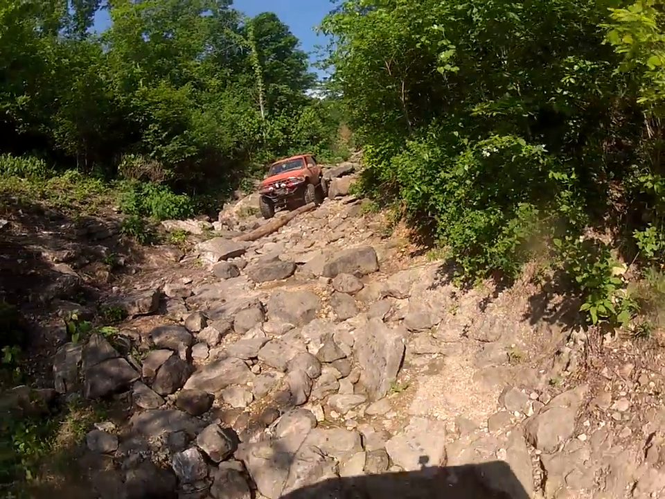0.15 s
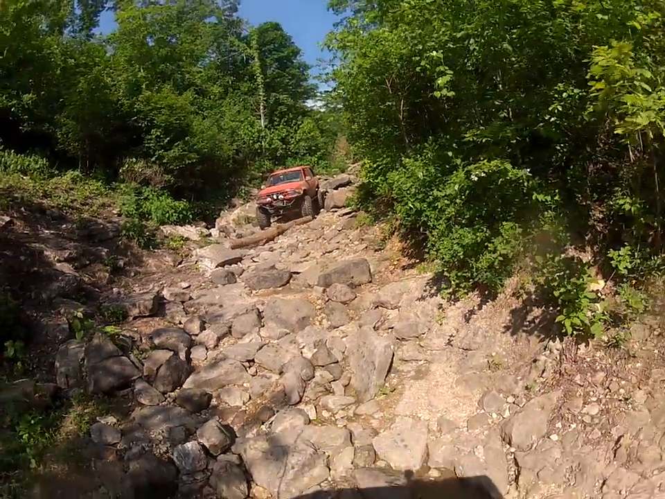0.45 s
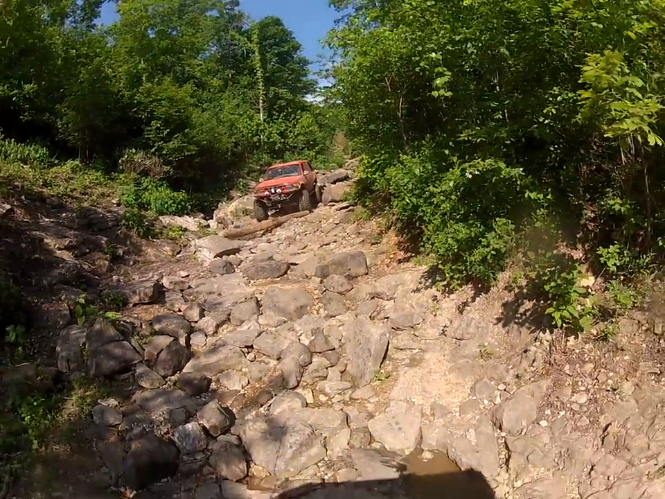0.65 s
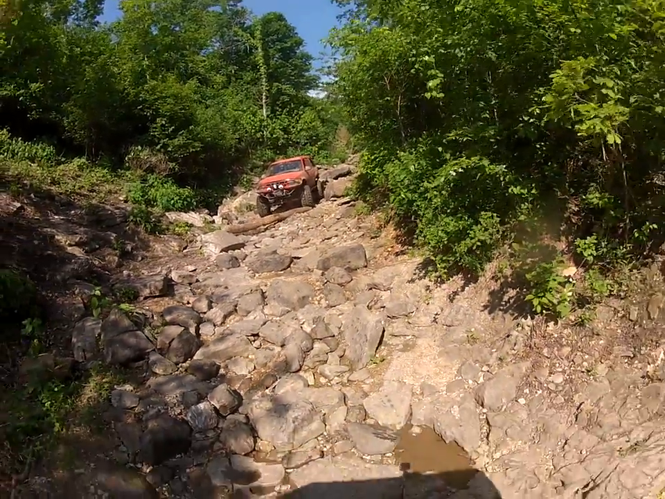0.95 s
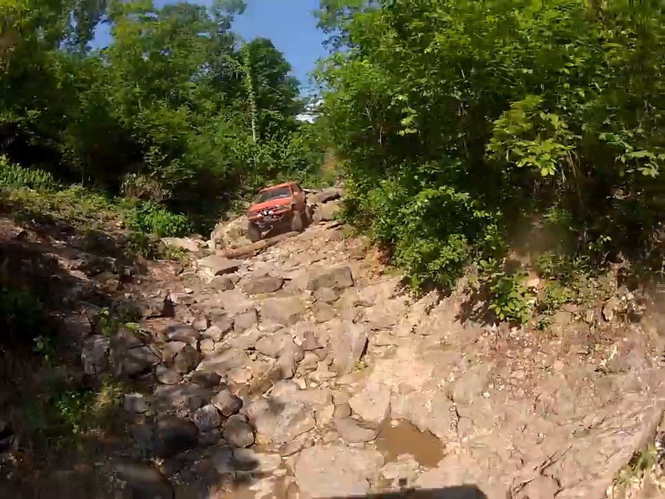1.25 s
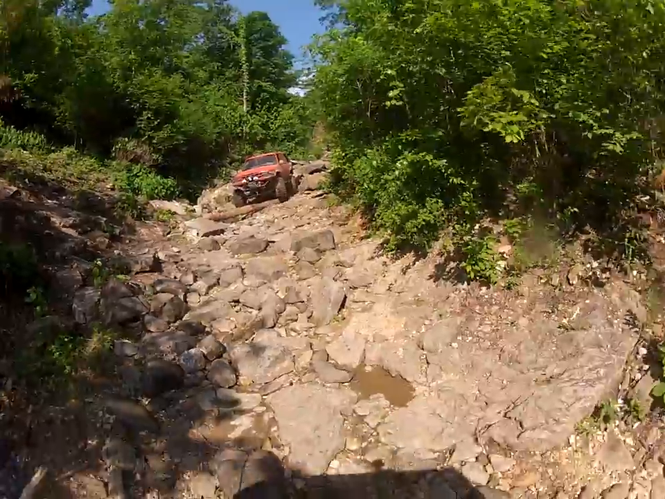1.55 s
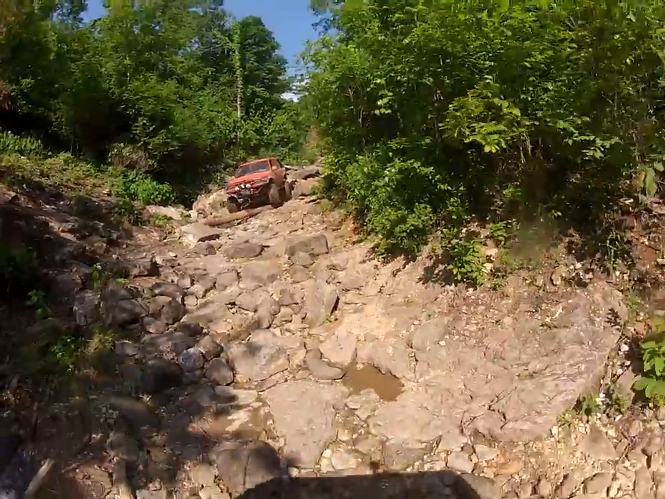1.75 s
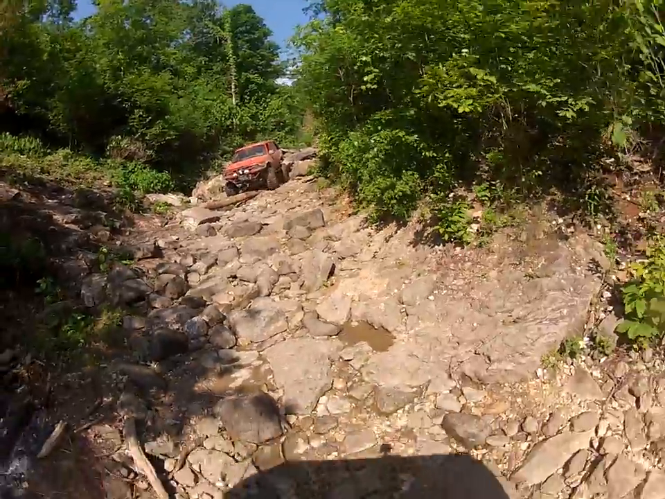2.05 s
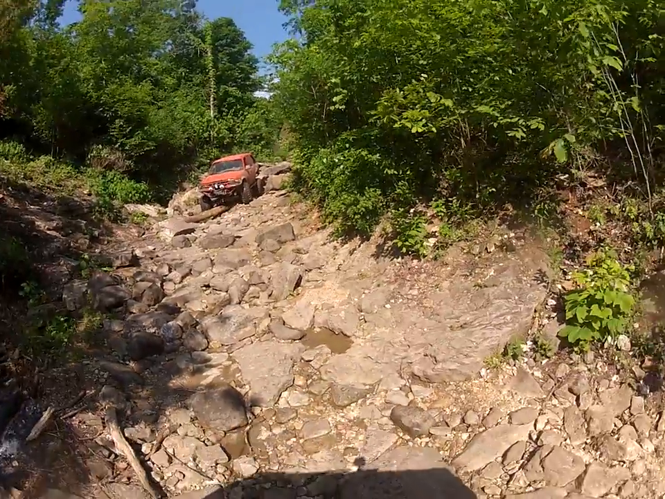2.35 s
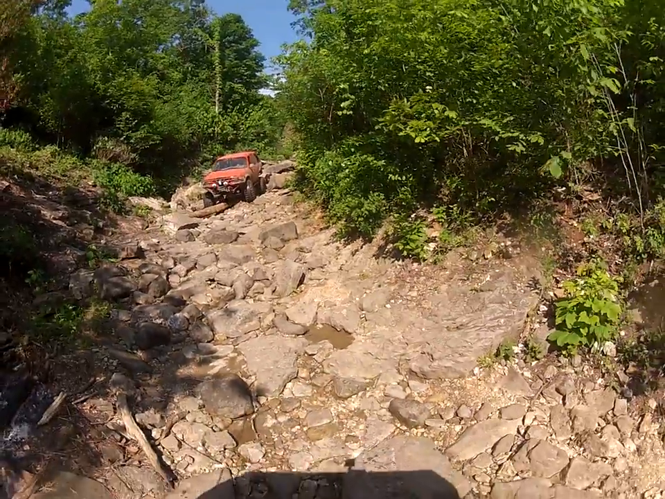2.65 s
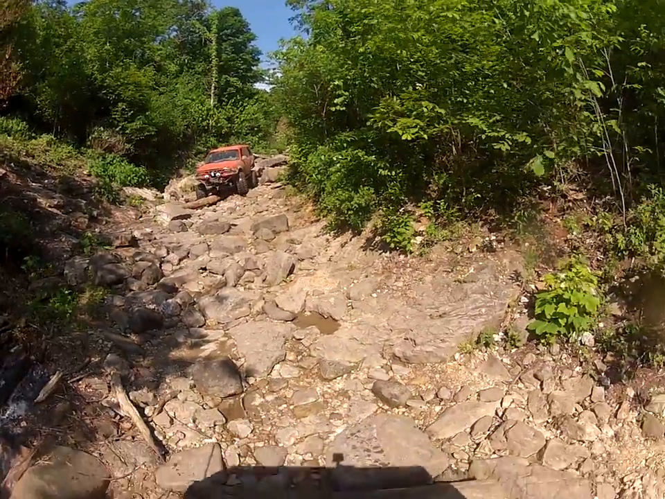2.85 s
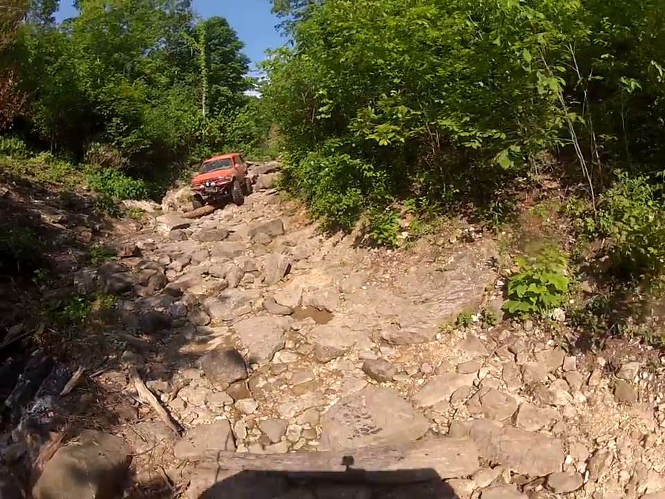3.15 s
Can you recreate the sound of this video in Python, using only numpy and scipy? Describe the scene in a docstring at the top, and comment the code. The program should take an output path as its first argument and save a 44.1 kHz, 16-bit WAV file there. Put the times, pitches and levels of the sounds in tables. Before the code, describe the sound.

A four-wheel-drive engine throbs low and unevenly, the body booming and shuddering. Light knocks come first, a hard one midway, then a crowded burst with a heavy jolt; outdoors, microphone fixed to the vehicle.

```python
"""A rocky trail, a four-wheel-drive at low revs, the microphone on a camera fixed to its body.
Throughout, pulses and a sine drone, bands of noise boom and shudder, and filtered noise grinds and hisses.
Light knocks ring the panel modes early, a squeak wavers and a stone crunches in noise; a hard knock follows
near 1.5 s. Knocks crowd in from 2.3 s, with a heavy push and ring of the frame at 2.4 s and two high squeaks.
Looser knocks and more crunching stones carry on almost to the end."""
import sys
import numpy as np
from scipy import signal
from scipy.fft import rfft, irfft
from scipy.io import wavfile
from scipy.ndimage import uniform_filter1d

SR = 44100
rng = np.random.default_rng(int(sys.argv[2]) if len(sys.argv) > 2 else 0)


def unload_wav(signal):
    """Save mono or channel-first audio to the path in sys.argv[1] as 16-bit WAV at rate SR, clipped to [-1, 1]."""
    wavfile.write(
        sys.argv[1],
        SR,
        np.round(np.clip(np.atleast_2d(signal).T, -1, 1) * 32767).astype(np.int16),
    )


N = 145530
T = np.arange(N) / SR  # time in s


def undb(db):
    """Decibels to gain."""
    return 10 ** (np.asarray(db) / 20)


def unit(x):
    """Scale by the standard deviation, to rms 1 about the mean."""
    return x / (np.std(x) + 1e-12)


def curve(table, axis=1):
    """One column of a table, joined by straight lines in time."""
    rows = np.array(table)
    return np.interp(T, rows[:, 0], rows[:, axis])


def colour(x, points):
    """Filter by a spectrum of (f/Hz, level/dB) points, rolled off below 20 Hz; rms 1."""
    hz, db = np.array(points).T
    f = np.maximum(np.fft.rfftfreq(N, 1 / SR), 1)
    gain = undb(np.interp(np.log(f), np.log(hz), db))
    low_cut = np.sqrt(1 + (20 / f) ** 6)
    return unit(irfft(rfft(x) * gain / low_cut, N))


def band(x, lo_hz, hi_hz, order=4):
    """Butterworth band-pass."""
    return signal.sosfilt(signal.butter(order, [lo_hz, hi_hz], "band", fs=SR, output="sos"), x)


def walk(rate):
    """Random drift of rms 1 that takes a new course `rate` times a second."""
    hold = max(int(SR / rate), 1)
    steps = np.repeat(rng.standard_normal(N // hold + 1), hold)
    return unit(uniform_filter1d(steps, hold)[:N])


def resonance(hz, width_hz):
    """A randomly driven resonance, its swells evened out by its own envelope; rms 1."""
    f = np.fft.fftfreq(N, 1 / SR)
    response = 1 / (1 + (2 * (f - hz) / width_hz) ** 2)
    z = unit(np.fft.ifft(np.fft.fft(rng.standard_normal(N)) * response))
    return unit(z.real / np.sqrt(abs(z) ** 2 + 0.076))


def grains(spread):
    """Noise made of tiny contacts of unequal size, in runs of 32 samples."""
    sizes = np.clip(np.repeat(rng.standard_normal(N // 32 + 1), 32)[:N], -2, 2)
    return unit(rng.standard_normal(N) * np.exp(spread * sizes))


def ring(modes):
    """Response of a set of decaying modes, of alternating sign, to one tap."""
    t = T[:SR // 3]
    out = 0
    for k, (hz, db, t60) in enumerate(modes):
        out = out + (-1) ** k * undb(db - 60 * t / t60) * np.sin(2 * np.pi * hz * t)
    return out


def engine():
    """A sine drone at the firing rate, with uneven cylinder pulses filtered by the exhaust."""
    # engine speed: t/s, firing rate f/Hz before a slight random drift
    firing = [(0.0, 87.05), (0.12, 93.4), (0.48, 98.7), (0.56, 94.44), (0.72, 89.84), (1.44, 86.7),
              (1.6, 96.3), (2.09, 90.2), (2.39, 101), (2.54, 90.03), (2.8, 95.5), (2.85, 92.45),
              (3.14, 99.8), (3.3, 95.6)]
    # swell of the whole engine sound: t/s, level/dB before the drone and pulse gains
    swell = [(0.0, -32), (0.29, -25.5), (0.49, -51), (0.71, -18.5), (0.73, -25), (1.05, -19), (1.26, -29),
             (1.47, -37.5), (1.51, -18.5), (1.6, -30), (2.01, -21), (2.14, -37), (2.21, -17.5), (2.32, -36),
             (2.34, -20.5), (2.51, -21), (2.55, -40), (2.59, -18.5), (2.67, -14.5), (2.88, -38.5),
             (2.96, -22.5), (3.3, -42.5)]
    # strength of eight firings in turn: relative level/dB before scatter
    cylinder_db = [-2.5, -13, -7, -1.5, -1.5, -5.5, -2.5, 9]
    # tone of the exhaust: f/Hz, relative level/dB
    exhaust_colour = [(30, -17.5), (65, 12.5), (110, 1.5), (140, 1.5), (185, -3), (280, -15.5), (460, -28),
                      (900, -40.5), (3000, -70), (9000, -100)]
    drone_db, flutter_db, pulse_db, scatter_db = 1.5, 1.5, -14.5, 8.5
    phase = np.cumsum(curve(firing) * (1 + .005 * walk(20))) / SR  # in firings
    at = np.flatnonzero(np.diff(np.floor(phase)))
    scatter = scatter_db * (2 * rng.random(N)[:len(at)] - 1)
    pulses = np.zeros(N)
    pulses[at] = undb(np.resize(cylinder_db, len(at)) + scatter)
    exhaust = undb(pulse_db) * colour(pulses, exhaust_colour)
    drone = np.sqrt(2) * np.sin(2 * np.pi * phase) * undb(drone_db + flutter_db * walk(30))
    return undb(curve(swell)) * (drone + exhaust)


def body(shake):
    """The panels boom as a noise-driven resonance and the body shudders on its mounts."""
    # boom of the panels: t/s, level/dB before trim and flutter
    boom_level = [(0.0, -63), (0.19, -18.5), (0.41, -32.5), (0.62, -23), (0.72, -38), (0.86, -20),
                  (1.05, -29.5), (1.15, -22.5), (1.18, -33.5), (1.66, -20.5), (1.7, -31.5), (2.3, -31.5),
                  (2.32, -18), (2.42, -15.5), (2.61, -32.5), (2.78, -13), (2.84, -27.5), (2.94, -18.5),
                  (3.11, -33), (3.3, -26)]
    # shudder on the mounts: t/s, level/dB before trim and flutter
    shudder_level = [(0.0, -24), (0.24, -41), (0.29, -16), (0.52, -39.5), (0.65, -22.5), (0.76, -26.5),
                     (0.92, -17), (1.16, -34.5), (1.19, -25.5), (1.51, -22), (1.56, -15), (1.96, -34.5),
                     (2.16, -19), (2.3, -22), (2.39, -13), (2.52, -21.5), (2.7, -23), (2.79, -34.5),
                     (2.89, -16), (2.95, -25), (3.21, -23.5), (3.3, -27)]
    boom_hz, boom_width_hz, boom_trim_db, boom_flutter_db = 113.43, 16.8, -1.5, 1.5
    shudder_trim_db, shudder_flutter_db = 0.5, 2
    boom_gain = undb(curve(boom_level) + boom_trim_db + boom_flutter_db * walk(30))
    shudder_gain = undb(curve(shudder_level) + shudder_trim_db + shudder_flutter_db * walk(20))
    return boom_gain * resonance(boom_hz, boom_width_hz) + shudder_gain * shake


def jolts():
    """A wheel drops off a ledge: one soft push through the suspension, and the frame rings briefly."""
    # heavy jolts: t/s, level/dB of the push at its peak, length/s of the push
    jolt_list = [(2.37, -2.5, 0.012), (2.396, -17, 0.0064)]
    ring_hz, ring_t60_s, ring_db = 166.6, .16, -9.5  # ring level relative to the push
    out = 0
    for start, db, length in jolt_list:
        age = np.maximum(T - start, 0)
        rise = np.minimum(age / length, 1)
        push = np.sin(np.pi * rise) ** 2
        frame = undb(ring_db - 60 * age / ring_t60_s) * rise * np.sin(2 * np.pi * ring_hz * age)
        out = out - undb(db) * (push + frame)
    return out


def knocks():
    """Each knock is a blow and a brief chatter of contacts that ring the low and high panel modes."""
    # knocks: t/s, thud level/dB, clack level/dB (before the treble cut), chatter decay/s, clack centre f/Hz
    knock_list = [(0.149, -64, -55, 0.011, 1700), (0.204, -41.5, -54, 0.014, 1650),
                  (.245, -49.5, -53, 0.013, 1720), (.27, -39, -57.5, 0.018, 1100),
                  (.901, -40.5, -36, 0.0025, 1620), (.905, -37.5, -36, 0.01, 1400),
                  (.96, -46, -53, 0.013, 1520), (1.513, -62, -46, 0.0083, 2040),
                  (1.524, -25, -45.5, 0.0068, 1198), (1.546, -40.5, -54, 0.0038, 1600),
                  (2.274, -43, -47, 0.012, 1320), (2.286, -38.5, -41.5, 0.0078, 1898),
                  (2.315, -28, -44.5, 0.01, 1196), (2.329, -33, -38, .018, 1610),
                  (2.353, -26.5, -44, 0.011, 1310), (2.367, -29, -41.5, .018, 1390),
                  (2.674, -33.5, -55, .024, 2000), (2.734, -34, -52, 0.027, 1200),
                  (2.85, -33, -55, 0.028, 1080), (2.887, -46, -45.5, 0.0043, 954),
                  (2.936, -36, -55, .028, 2098), (3.026, -54.5, -55, .006, 1061),
                  (3.158, -44.5, -60.5, 0.0072, 2020)]
    # low ringing of the body: f/Hz, relative level/dB, t60/s
    low_modes = [(154, 2.5, 0.16), (274.8, 0, 0.16), (303, 3.5, .07), (405, -4.5, 0.09), (462, -14.5, 0.2),
                 (587.5, -5, 0.048)]
    # high ringing of the body: f/Hz, relative level/dB, t60/s
    high_modes = [(894, -2, 0.15), (1045, -5, 0.18), (1163, 5.5, 0.07), (1270, -1, 0.067), (1464, -7, 0.12),
                  (1688, 0.5, 0.042), (1810, 0, 0.11), (1918, 4.5, 0.042), (2165, 2.5, 0.044),
                  (2190, -9.5, .05)]
    crack_db, rise_share, focus_octaves = 4, 0.22, 0.96
    hard_blow_s = .007  # chatter longer than this weakens the first blow
    count = 2 ** 14  # samples in one knock
    out = np.zeros(N + SR)
    low, high, t = ring(low_modes), ring(high_modes), T[:count]
    f = np.maximum(np.fft.rfftfreq(count, 1 / SR), 1)

    def peak(v):
        """Scale so that the loudest 300 samples have rms 1."""
        return v / np.sqrt(uniform_filter1d(v * v, size=300).max())

    for start, thud_db, clack_db, length, hz in knock_list:
        contacts = rng.standard_normal(count)
        envelope = np.minimum(t / (rise_share * length), 1) * np.exp(-t / length)
        chatter = contacts * abs(contacts) * envelope
        first_blow = signal.unit_impulse(count) * (hard_blow_s / length) ** 2
        blow = first_blow + chatter / np.linalg.norm(chatter)
        thud = peak(signal.fftconvolve(blow, low)[:count])
        crack = undb(crack_db) * peak(band(chatter, 700, 2300, order=10))
        clack = peak(signal.fftconvolve(chatter, high)[:count]) + crack
        focus = 1 / (1 + (np.log2(f / hz) / focus_octaves) ** 2)
        clack = peak(irfft(rfft(clack) * focus, count) * (t < t[-1] / 2))
        i = int(start * SR)
        out[i:i + count] += undb(thud_db) * thud + undb(clack_db) * clack
    return signal.sosfilt(signal.butter(10, 2450, fs=SR, output="sos"), out[:N])


def tyres():
    """Noise rumbles through the chassis, and grainy noise is the grit ground under the tread."""
    # tyres over rock: t/s, rumble level/dB, grit level/dB, both before trim
    tyre_levels = [(0, -45.5, -57.5), (.27, -46, -52.5), (.5, -42, -55), (.7, -45.5, -53.5),
                   (.9, -43.5, -52.5), (1.25, -50, -55.5), (1.48, -41.5, -54.5), (1.72, -49, -55.5),
                   (2.05, -50, -55.5), (2.22, -43.5, -54), (2.38, -36.5, -52.5), (2.52, -44, -53.5),
                   (2.69, -36, -52), (2.8, -44, -52.5), (2.87, -39, -51.5), (3.0, -51, -57),
                   (3.1, -47, -55), (3.3, -49, -59)]
    # tone of the rumble: f/Hz, relative level/dB
    rumble_colour = [(20, 11), (40, 19.5), (52, 16), (65, 25), (100, 21.5), (140, 1.5), (158, 11.5),
                     (200, -2.5), (240, 0), (285, 1.5), (345, -5.5), (400, -12.5), (500, -15), (570, -14.5),
                     (720, -22.5), (1100, -30.5), (2500, -56.5)]
    # tone of the grit: f/Hz, relative level/dB
    grit_colour = [(300, -13.5), (700, -7), (1080, 6.5), (1500, -6.5), (2000, 5.5), (2380, 3),
                   (2620, -27.5), (2950, -0.5), (3600, -14.5), (4800, -20.5), (6200, -24), (9000, -15),
                   (16000, -35)]
    rumble_trim_db, grit_trim_db, grit_flicker_db = 16, -6.5, 2
    rumble_gain = undb(curve(tyre_levels) + rumble_trim_db)
    rumble = colour(rng.standard_normal(N), rumble_colour) * rumble_gain
    grit_gain = undb(curve(tyre_levels, axis=2) + grit_trim_db + grit_flicker_db * walk(40))
    return rumble + colour(grains(spread=0.28), grit_colour) * grit_gain


def crunches():
    """A stone gives way: a sudden, dying spray of bright, grainy noise."""
    # stones under the tread: t/s, level/dB before attack and decay, decay/s
    crunch_list = [(0.511, -52, 0.012), (0.865, -55, 0.025), (1.269, -54.5, 0.014), (1.36, -46, 0.045),
                   (2.288, -39.5, 0.008), (2.333, -46.5, 0.011), (2.369, -48.5, 0.011), (2.551, -40, 0.036),
                   (2.68, -51, 0.017), (3.141, -55.5, 0.039)]
    # tone of the crunch: f/Hz, relative level/dB
    crunch_colour = [(300, -16.5), (1050, 0.5), (1450, -9.5), (2100, 3.5), (2650, -4), (3050, 2),
                     (3500, -9), (4600, -14), (6100, -26.5), (7500, -18), (9100, -10), (11000, -32),
                     (13000, -25), (15000, -15.5)]
    attack_s = 0.0024
    power = 0
    for start, db, decay in crunch_list:
        age = np.maximum(T - start, 0)
        envelope = undb(db) * np.minimum(age / attack_s, 1) * np.exp(-age / decay)
        power = power + envelope ** 2
    return np.sqrt(power) * colour(grains(spread=0.17), crunch_colour)


def squeaks():
    """Short, faint, falling sine tones whose pitch wavers at random."""
    # squeaks: t/s, length/s, middle f/Hz, peak level/dB, fall of the pitch as a share per s
    squeak_list = [(0.359, 0.11, 1335, -52.5, .4), (0.735, .14, 1320, -60.5, .3),
                   (2.455, .085, 5000, -66, 1.2), (2.465, .05, 7000, -66, .3)]
    out = 0
    for start, length, hz, db, fall in squeak_list:
        age = np.clip(T - start, 0, length)
        pitch = hz * (1 + 0.016 * walk(300) - fall * (age - length / 2))
        tone = np.sin(2 * np.pi * np.cumsum(pitch) / SR)
        out = out + undb(db) * np.sin(np.pi * age / length) * tone
    return out


def air():
    """A soft, steady outdoor hiss of filtered noise."""
    # tone of the hiss: f/Hz, relative level/dB
    air_colour = [(200, 4), (1080, 3), (1500, -3.5), (2200, 7), (2650, 2.5), (3000, -9), (3800, -2),
                  (4900, -5.5), (6100, -18.5), (7300, -7.5), (8500, -14.5), (9900, -4.5), (11000, -30),
                  (14300, -18.5), (16000, -32)]
    return undb(-64) * colour(rng.standard_normal(N), air_colour)


def scene():
    """The vehicle over the outdoor hiss; the shudder of the body makes the drone throb."""
    shake = resonance(hz=26.85, width_hz=11.2)
    throb = 1 + 0.17 * shake
    vehicle = engine() * throb + body(shake) + jolts() + knocks() + squeaks()
    return (vehicle + tyres() + crunches() + air())[None]


def record(dry):
    """The camera mirrors the lows faintly around a high tone, a thin whine with the drone, and cuts the top."""
    image_hz, image_band_hz, image_db = 12000, 2400, -37.5
    knee_hz, mids_db = 910, -9  # the upper part of the mirrored band is stronger
    top_hz = 15400
    lows = signal.sosfiltfilt(signal.butter(8, image_band_hz, fs=SR, output="sos"), dry)
    mids = signal.sosfiltfilt(signal.butter(2, knee_hz, "high", fs=SR, output="sos"), lows)
    image = (undb(image_db) * lows + undb(mids_db) * mids) * np.cos(2 * np.pi * image_hz * T)
    return signal.sosfilt(signal.ellip(8, .2, 70, top_hz, fs=SR, output="sos"), dry + image)


dry = scene()
out = record(dry)
unload_wav(out)
```